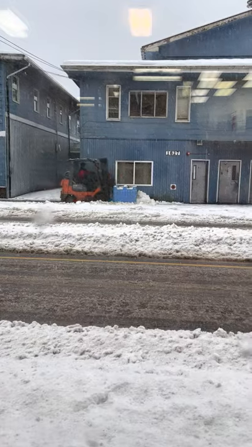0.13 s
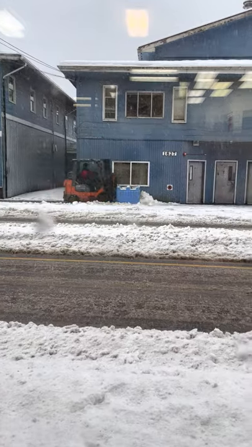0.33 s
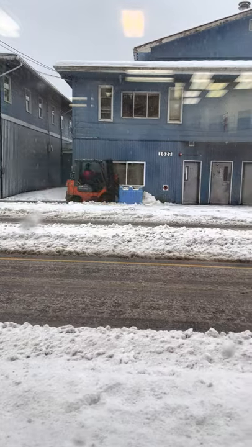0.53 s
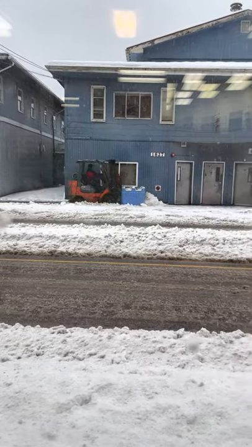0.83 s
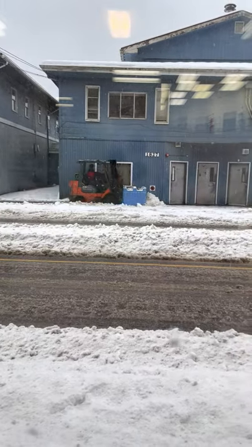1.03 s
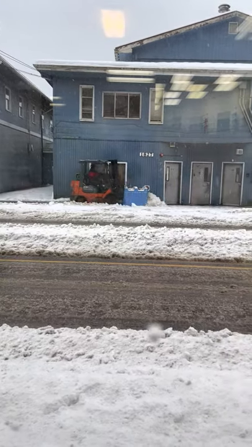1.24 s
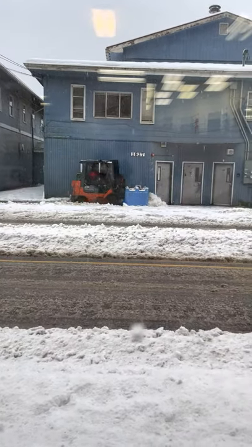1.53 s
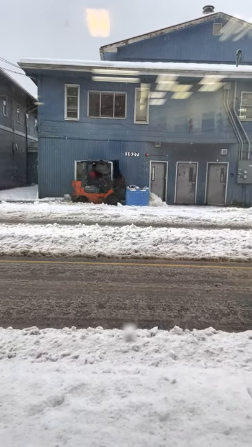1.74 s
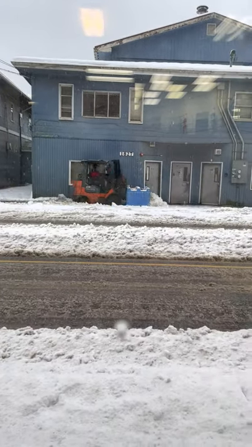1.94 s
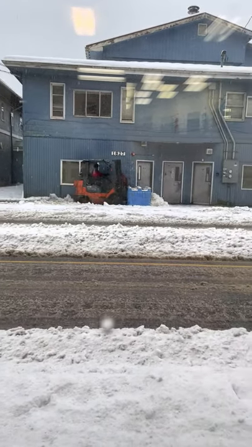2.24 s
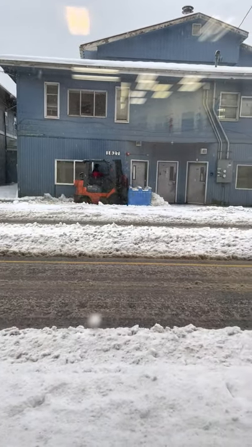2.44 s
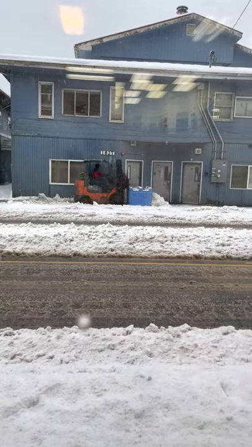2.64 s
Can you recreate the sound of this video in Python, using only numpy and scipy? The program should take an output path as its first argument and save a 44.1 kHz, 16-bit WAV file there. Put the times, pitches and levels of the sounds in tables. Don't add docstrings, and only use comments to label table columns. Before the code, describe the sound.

A forklift engine drones deep and muffled outside, throbbing unevenly, with two dull early bumps

```python
import sys
import numpy as np
from scipy import signal
from scipy.fft import rfft, irfft, next_fast_len
from scipy.io import wavfile

SR = 44100
rng = np.random.default_rng(int(sys.argv[2]) if len(sys.argv) > 2 else 0)


def inscribe(sig):
    pcm = np.round(np.clip(np.atleast_2d(sig).T, -1, 1) * 32767)
    wavfile.write(sys.argv[1], SR, pcm.astype(np.int16))


def invert_db(level):
    return 10 ** (np.asarray(level, dtype=float) / 20)


N = 123039
T_S = np.arange(N) / SR
FFT_LEN = next_fast_len(N)
HZ = np.maximum(np.fft.rfftfreq(FFT_LEN, 1 / SR), 1)
FRAME = dict(fs=SR, window="cosine", nperseg=2048, noverlap=1024)


def engine():
    # start_s, deep_db, throb_db, load_db
    rumble = [(0.13, -35.5, -45, -55), (0.18, -30, -32, -38.5), (0.28, -42, -47.5, -47.5),
              (0.31, -32.5, -35.5, -39.5), (0.53, -38.5, -44.5, -46), (0.56, -39.5, -32.5, -48),
              (0.98, -38, -37, -52), (1.18, -39, -38.5, -46), (1.36, -41, -33, -43.5),
              (1.38, -50, -40.5, -52), (1.52, -43, -34, -45), (2.0, -41, -38.5, -38),
              (2.33, -50, -36.5, -43.5), (2.57, -37, -47, -39), (2.65, -45, -34, -37),
              (2.69, -36.5, -48, -48), (2.73, -34.5, -32, -61), (2.78, -41.5, -41.5, -78)]
    # start_s, strain_db
    strain = [(0.13, -44), (1.05, -49), (1.15, -42), (1.45, -39.5), (1.6, -41), (1.81, -40), (2.0, -52),
              (2.17, -38), (2.27, -52), (2.72, -39.5), (2.78, -46)]
    # pitch_hz, wander_hz, level_db, slope_db_per_s
    deep_tones = [(40, 2.9, -8, -3), (56.4, 4.55, -3.5, -1), (74.63, 2, 2, 0)]
    pane_tones = [(104.7, 2, 3.5, 2), (116.6, 2.53, 0.5, 1), (314, 1.94, -7.5, -3)]
    load_tones = [(152.1, 1.0, 0, 0), (247.5, .8, -5.5, 1), (494.8, 1.4, -14.5, 0), (421.4, 2.0, -18, 0)]
    drive_tones = [(207.4, 1.37, -1.5, 1.5), (221.8, 1.54, -1.5, -2), (249.5, 1.0, -12, 5)]
    # freq_hz, level_db_per_hz
    roar = [(20, -15), (60, 2.5), (200, -1), (350, -8), (600, -14), (1100, -24.5), (2000, -26),
            (12000, -64)]
    deep_db, idle_db, load_db = in_time(rumble)
    strain_db, = in_time(strain)
    thud = invert_db(deep_db - 0.5) * rms_one(tones(deep_tones, throb_db=3.0))
    idle = invert_db(idle_db - 0.04) * rms_one(tones(pane_tones, throb_db=1.2))
    load = invert_db(load_db + 3.0) * tones(load_tones, throb_db=1.3)
    drive = invert_db(strain_db + 1.5) * tones(drive_tones, throb_db=2.2)
    return thud + idle + load + drive + invert_db(-39) * patchy(roar, patchy_db=-0.05, rate_hz=14.0)


def pump():
    # start_s, level_db
    pump_level = [(.13, -62), (.3, -70), (1.0, -69), (1.3, -66), (1.5, -70), (2.12, -70), (2.22, -60),
                  (2.4, -58), (2.55, -54.5), (2.68, -58), (2.78, -66)]
    # start_s, speed_share_of_nominal
    pump_speed = [(.13, 1.0), (2.1, 1.03), (2.22, 1.035), (2.3, 1.01), (2.5, .995), (2.58, .985),
                  (2.68, 1.015), (2.78, 1.0)]
    # pitch_hz, level_db
    clear_tones = [(868, -13), (995, -8), (1495, -13), (1990, .5), (2455, -9)]
    # centre_hz, width_hz, level_db
    rough_bands = [(996, 22, -6), (1500, 35, -7), (1988, 55, -5), (2455, 35, -9), (2770, 150, -5),
                   (3560, 55, -11)]
    level_db, = in_time(pump_level)
    speed, = in_time(pump_speed)
    clear = 0
    for hz, db in clear_tones:
        turns = hz * np.cumsum(speed + .004 * drift(25.0)) / SR
        clear = clear + invert_db(db + 1.8 * drift(14.0)) * np.sin(2 * np.pi * turns)
    whine = resonant(rough_bands) + clear * [[1], [.3]]
    return invert_db(level_db + 1.2 * drift(20.0)) * whine


def slush():
    # start_s, level_db
    slush_level = [(0.13, -49.5), (0.18, -51.5), (0.19, -50.5), (0.22, -52), (0.65, -53), (0.7, -50),
                   (1.07, -54), (1.27, -51.5), (1.47, -53.5), (2.0, -54.5), (2.14, -51), (2.33, -47),
                   (2.65, -47), (2.78, -49)]
    # freq_hz, level_db_per_hz
    hiss = [(500, -3), (1200, -9), (2000, -0.5), (3200, -2.5), (5000, -5.5), (8000, -9.5), (10500, -10),
            (11900, -20.5)]
    level_db, = in_time(slush_level)
    swing_db = 1.79 * (level_db - level_db.mean())
    return invert_db(-55.0 + swing_db) * patchy(hiss, patchy_db=0.86, rate_hz=1.5)


def puffs():
    # start_s, length_s, level_db
    puff_events = [
        (0.781, 0.059, -53),
        (0.846, 0.048, -59),
        (2.295, 0.056, -52),
        (2.648, 0.078, -51.5),
    ]
    # freq_hz, level_db_per_hz
    puff_colour = [(3000, -34), (5500, -8.5), (8000, -16), (10500, -5), (11600, -11.5), (12400, -30)]
    # start_s, length_s, pitch_hz, level_db
    whistles = [(2.35, .14, 5900, -63), (1.72, .22, 6750, -68), (1.25, .3, 2200, -60), (.18, .1, 1700, -58),
                (.77, .14, 5900, -64), (.68, .08, 1400, -61), (2.42, .1, 2950, -57), (1.4, .2, 2400, -62),
                (2.32, .1, 2800, -58), (2.54, .1, 2850, -57), (2.47, .06, 2450, -58), (.72, .2, 2500, -63),
                (.93, .1, 2500, -61), (2.38, .08, 1520, -59), (.14, .06, 2000, -57), (2.64, .05, 3750, -60),
                (2.18, .05, 3550, -62)]
    fine_whistles = [(1.44, .24, 5320, -67), (1.7, .22, 6620, -69), (1.27, .25, 2180, -64),
                     (.17, .1, 1680, -62)]
    spray = [
        (2.47, .22, 4300, -59),
        (.75, .2, 1900, -58),
        (.72, .16, 1000, -58),
    ]
    shape = sum(invert_db(db) * np.exp(-(2 * (T_S - s) / length_s) ** 2) for s, length_s, db in puff_events)
    thin = bursts(whistles, .09) + bursts(fine_whistles, .012) + bursts(spray, .6)
    late = np.roll(thin, 3)
    return shape * noise(gain_at(puff_colour)) + thin * [[1], [0]] + late * [[0], [.5]]


def knocks():
    # start_s, peak_db
    bumps = [
        (.17, -48),
        (.295, -23),
        (.81, -25),
    ]
    # mode_hz, level_db, t60_s
    bump_modes = [(70.4, -6.5, 0.36), (104.7, -6, 0.19)]
    # start_s, peak_db
    ticks = [(.300, -54), (.325, -57), (.70, -54), (.852, -51), (.898, -57), (1.07, -58), (.195, -57)]
    tick_hz, tick_t60_s = 4000, .035
    low = sum(invert_db(db) * ring(bumps, hz, t60_s) for hz, db, t60_s in bump_modes)
    return low + ring(ticks, tick_hz, tick_t60_s) + .6 * ring(ticks, 1.04 * tick_hz, tick_t60_s)


def spit():
    # start_s, length_s, low_hz, high_hz, level_db
    spit_event = (2.752, .055, 8950, 9600, -76)
    s, length_s, low_hz, high_hz, db = spit_event
    band = noise((HZ > low_hz) & (HZ < high_hz))[0]
    return invert_db(db) * np.exp(-(2 * (T_S - s) / length_s) ** 4) * band


def hum():
    # centre_hz, width_hz, level_db_rms
    hum_bands = [(26.4, 6, -52.5), (137, 18, -51), (166, 19, -54.5), (274.8, 5.8, -57), (330, 14, -57),
                 (443.6, 8.5, -63.5), (511, 12.6, -58.5), (560, 20, -58), (630, 17, -58.5),
                 (747, 38, -62.5), (857, 23, -64), (1010, 7.3, -78)]
    return resonant(hum_bands)


def air():
    # freq_hz, level_db_per_hz
    air_colour = [(700, -2.5), (2000, -1), (3500, -9), (6000, -9), (8000, -16), (10300, -6), (11400, -13),
                  (12100, -36)]
    return invert_db(-55.5) * patchy(air_colour, patchy_db=1.5, rate_hz=10.6)


def tones(rows, throb_db):
    out = 0
    for hz, wander_hz, db, slope_db_per_s in rows:
        level_db = db + slope_db_per_s * (T_S - 0.88) + throb_db * drift(5.4)
        turns = np.cumsum(hz + wander_hz * drift(5.7)) / SR
        out = out + invert_db(level_db) * np.sin(2 * np.pi * turns)
    return out


def patchy(spectrum, patchy_db, rate_hz):
    whole = rfft(rng.standard_normal((2, FFT_LEN))) * gain_at(spectrum)
    together, out = drift(rate_hz), 0
    for centre_oct in np.arange(4, 14.1, .5):
        band = np.cos(np.pi * np.clip(np.log2(HZ) - centre_oct, -.5, .5)) ** 2
        flicker_db = patchy_db * (0.29 * together + drift(2.9 * rate_hz))
        out = out + back(whole * band) * invert_db(flicker_db)
    return rms_one(out)


def resonant(rows):
    power = sum(invert_db(2 * db) / width_hz / (1 + (2 * (HZ - hz) / width_hz) ** 2) ** 2
                for hz, width_hz, db in rows)
    total_rms = np.sqrt(sum(invert_db(2 * db) for _, _, db in rows))
    return total_rms * noise(np.sqrt(power))


def bursts(rows, width):
    white, out = rfft(rng.standard_normal(FFT_LEN)), 0
    for s, length_s, hz, db in rows:
        band = rms_one(back(white / (1 + (2 * (HZ - hz) / (width * hz)) ** 2)))
        out = out + invert_db(db) * np.exp(-(2 * (T_S - s) / length_s) ** 4) * band
    return out


def ring(events, hz, t60_s):
    clicks = np.full(N, 1e-18)
    for s, db in events:
        clicks[int(s * SR)] = invert_db(db)
    r, w = invert_db(-60 / (t60_s * SR)), 2 * np.pi * hz / SR
    return signal.lfilter([0, np.sin(w)], [1, -2 * r * np.cos(w), r * r], clicks)


def grain(x):
    hz, _, cells = signal.stft(x, **FRAME)
    speckle = rms_one(invert_db(4.5 * rng.standard_normal(cells.shape[1:])))
    gain = np.where(hz[:, None] > 1500, speckle, 1)
    return signal.istft(cells * gain, **FRAME)[1][:, :N]


def noise(gain):
    return rms_one(back(rfft(rng.standard_normal((2, FFT_LEN))) * gain))


def drift(rate_hz):
    r = np.exp(-80 * np.pi * rate_hz / SR)
    slow = signal.lfilter([1], [1, -2 * r, r * r], rng.standard_normal(N // 40 + 2002))[2000:]
    return np.interp(np.arange(N) / 40, np.arange(len(slow)), rms_one(slow - slow.mean()))


def gain_at(points):
    hz, db = np.transpose(points)
    return invert_db(np.interp(np.log(HZ), np.log(hz), db))


def in_time(rows):
    s, *columns = np.transpose(rows)
    return [np.interp(T_S, s, c) for c in columns]


def back(spectrum):
    return irfft(spectrum, FFT_LEN)[..., :N]


def rms_one(x):
    return x / np.sqrt(np.mean(x ** 2) + 1e-20)


def scene():
    # freq_hz, left_lead_rad
    port_phase = [(0, 0), (1030, -.1), (2240, .1), (2500, .8), (3960, .6), (4570, 1.8), (5250, 5.0),
                  (5650, 5.9), (5750, 2 * np.pi), (6220, 2 * np.pi), (6320, 6.7), (8500, 8.9), (8760, 9.2),
                  (8800, 3 * np.pi), (9580, 3 * np.pi), (9680, 9.9), (11700, 12.0), (11800, 4 * np.pi)]
    # freq_hz, level_db_under_direct
    diffuse_level = [(60, -60), (190, -38), (350, -18), (620, -10), (1100, -5.5), (1800, -16), (3000, -5.5),
                     (4900, -9)]
    steady = engine() + hum() + grain(slush() + air()) + pump() + knocks() * [[1], [0]]
    steady_top_hz, diffuse_top_hz = 11720, 5750
    spectra = rfft(steady, FFT_LEN) * (HZ < steady_top_hz) + rfft(grain(puffs()), FFT_LEN)
    direct, diffuse = spectra
    half_rad = np.interp(HZ, *np.transpose(port_phase)) / 2
    side = diffuse * gain_at(diffuse_level) / (1 + (HZ / diffuse_top_hz) ** 60)
    left = (direct + side) * np.exp(1j * half_rad)
    right = (direct - side) * np.exp(-1j * half_rad)
    return back(np.array([left, right])) + spit()


def mute_band(x):
    # from_s, to_s
    muted_spans = [(.28, .31), (.65, .81), (.88, .92), (.96, 1.05), (1.13, 1.27), (1.38, 1.41),
                   (1.55, 1.74), (1.82, 1.88), (1.93, 1.96), (2.12, 2.8)]
    hz, s, common = signal.stft(x.mean(axis=0), **FRAME)
    in_span = sum((s > from_s) & (s < to_s) for from_s, to_s in muted_spans)
    in_band = (hz > 8290) & (hz < 8900)
    muted = in_span * in_band[:, None]
    return x - signal.istft(common * muted, **FRAME)[1][:N]


def top_cut(x):
    return signal.sosfilt(signal.butter(12, 12230, fs=SR, output="sos"), x)


def record(dry):
    start_s = .1203
    mix = mute_band(dry) * (np.arange(N) >= start_s * SR)
    return top_cut(mix)


dry = scene()
out = record(dry)
inscribe(out)
```